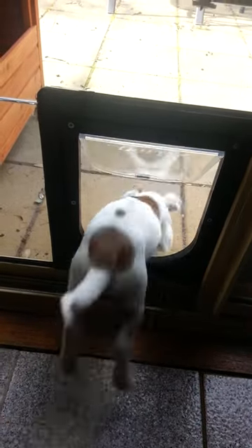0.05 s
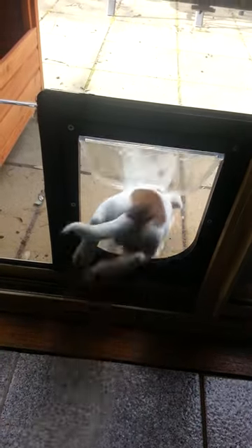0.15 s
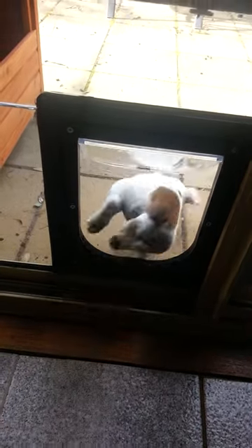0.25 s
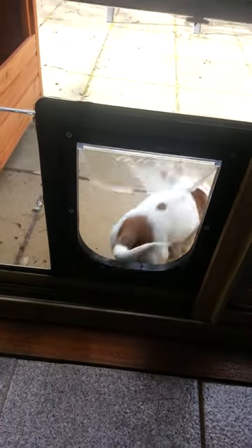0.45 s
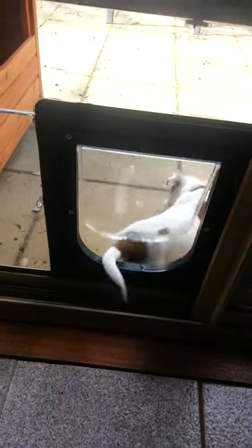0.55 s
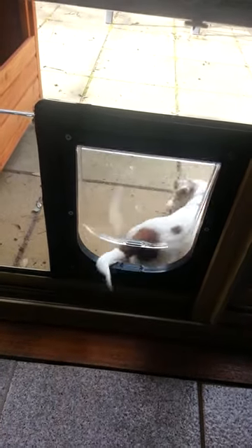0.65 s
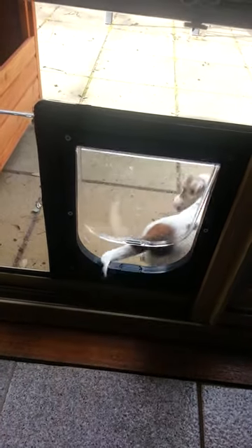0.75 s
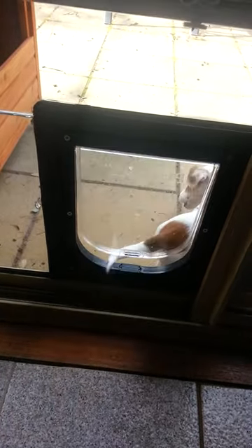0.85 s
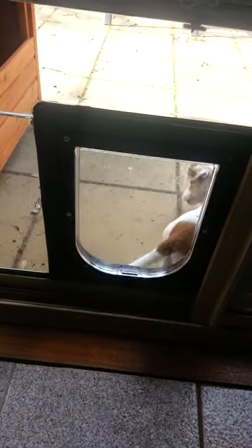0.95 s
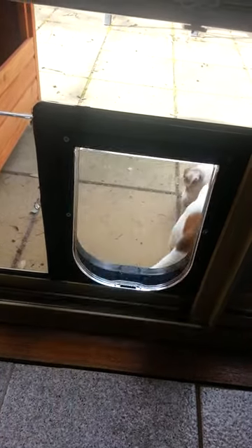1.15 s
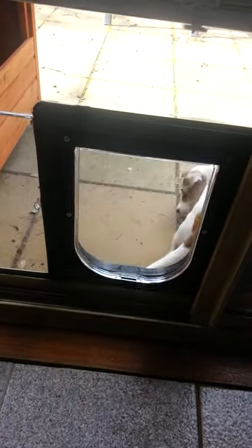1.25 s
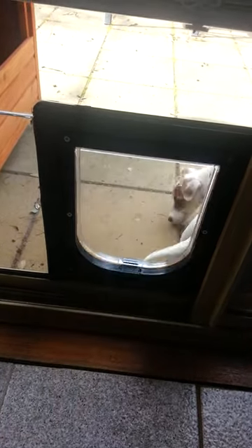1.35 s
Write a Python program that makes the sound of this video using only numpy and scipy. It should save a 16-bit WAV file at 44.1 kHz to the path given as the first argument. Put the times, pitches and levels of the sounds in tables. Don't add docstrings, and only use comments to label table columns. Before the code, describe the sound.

A plastic pet flap clatters and bangs in its door as a puppy scrambles through

```python
import sys
import numpy as np
from scipy import signal
from scipy.fft import rfft, irfft, next_fast_len
from scipy.io import wavfile
from scipy.ndimage import uniform_filter1d

SR = 44100
rng = np.random.default_rng(int(sys.argv[2]) if len(sys.argv) > 2 else 0)


def makeup_ratio(level_db):
    decades = np.asarray(level_db, float) / 20
    return 10 ** decades


def generate_wav(sig):
    pcm = np.round(np.clip(np.atleast_2d(sig).T, -1, 1) * 32767).astype(np.int16)
    wavfile.write(sys.argv[1], SR, pcm)


N = 61739
T = np.arange(N) / SR
WIDE = next_fast_len(N)
HZ = np.maximum(np.arange(WIDE // 2 + 1) * SR / WIDE, 1)


def along(table, hz, axis=1):
    table = np.array(table)
    return np.interp(np.log(hz), np.log(table[:, 0]), table[:, axis])


def unit(x):
    return x / np.sqrt(np.sum(x ** 2, axis=-1, keepdims=True))


def fade(t, t60):
    return np.exp(-np.log(1000) * t / np.maximum(t60, .002))


def band(x, hz, width):
    bell = np.exp(-(np.log2(HZ / hz) / width) ** 2)
    return irfft(rfft(x, WIDE) * bell, WIDE)[..., :N]


def slow_noise(size, passes=1):
    x = rng.standard_normal(N)
    for _ in range(passes):
        x = uniform_filter1d(x, size=size)
    return unit(x) * np.sqrt(N)


def coloured(table, alike_hz):
    mid, side = rfft(rng.standard_normal((2, WIDE)))
    apart = np.sqrt(1 / (1 + (alike_hz / HZ) ** 2))
    pair = (mid + apart * side * np.array([[1], [-1]])) / np.sqrt(1 + apart ** 2)
    return unit(irfft(pair * makeup_ratio(along(table, HZ)), WIDE)[:, :N]) * np.sqrt(N)


def tail(table, alike_hz, size, count=1):
    noise = coloured([(20, 0), (20000, 0)], alike_hz)
    centres = 50 * 2 ** (np.arange(17) / 2)
    t60 = along(table, centres, axis=2)[:, None]
    bands = np.array([band(noise, c, 0.59) for c in centres])
    level = makeup_ratio(along(table, centres))[:, None] / np.sqrt(t60)
    shape = (level * fade(T[:size], t60))[:, None]
    step = (N - size) // count
    return [unit(np.sum(bands[..., k * step:k * step + size] * shape, axis=0)) for k in range(count)]


def ring(modes, scatter_db, size):
    hz, db, t60 = np.array(modes).T[:, :, None]
    t = T[:size]
    waves = makeup_ratio(db + scatter_db[:, None]) * fade(t, t60) * np.sin(2 * np.pi * hz * t)
    return unit(np.sum(waves, axis=0))


def add(out, at_s, x):
    i = int(round(at_s * SR))
    x = x[..., max(-i, 0):N - i]
    out[:, max(i, 0):max(i, 0) + x.shape[-1]] += x


# frequency in Hz, level in dB per Hz.
ROOM_TONE = [(25, -24), (110, -10.5), (230, -6.5), (450, -12), (2000, -24), (6500, -31.5), (11500, -27),
             (15700, -28.5)]
# time in seconds, gain in dB.
TONE_GAIN = [
    (0, 5),
    (.7, 5),
    (1.0, 0.5),
    (1.2, 2.5),
    (1.3, -2),
    (1.4, -0.5),
]
TONE_DB, TONE_ALIKE_HZ = -54, 490


def room_tone():
    gain_db = np.interp(T, *np.array(TONE_GAIN).T)
    return makeup_ratio(TONE_DB + gain_db) * coloured(ROOM_TONE, TONE_ALIKE_HZ)


# frequency in Hz, level in dB, t60 in seconds.
ROOM = [(80, -5, 0.17), (200, 0, 0.68), (605, 2.5, 0.49), (1500, -3, 0.67), (2600, -0.5, 0.42),
        (3840, -3, 0.76), (5600, -7, 0.77), (13700, 3.5, 0.063)]
ROOM_DB, ROOM_DELAY_S, ROOM_ALIKE_HZ = -7.5, 0.0029, 836


def reverberation(x):
    size = 30000
    build_up = 1 - np.exp(-(T[:size] / ROOM_DELAY_S) ** 2)
    echo = tail(ROOM, ROOM_ALIKE_HZ, size)[0] * build_up
    return makeup_ratio(ROOM_DB) * signal.fftconvolve(x[:1], echo, axes=1)[:, :N]


# frequency in Hz, level in dB per Hz.
FUR = [(59, -32), (100, -18), (640, 0.5), (1180, -7.5), (1430, -4.5), (4280, -10), (6950, -23),
       (13900, -18), (15500, -37)]
# time in seconds, fur level in dB, claw squeak level in dB.
BRUSH = [
    (0, -41.5, -54),
    (.04, -44, -61),
    (.085, -42, -61),
    (0.109, -50.5, -55),
    (.15, -44, -48.5),
    (0.174, -57.5, -57),
    (0.202, -52, -80),
    (.3, -67, -78),
]
SQUEAK_HZ = 4270


def brush():
    s, fur_db, squeak_db = np.array(BRUSH).T
    patchy = slow_noise(300)
    fur = coloured(FUR, 1000) * makeup_ratio(np.interp(T, s, fur_db) + 1.2 * patchy)
    squeak = unit(band(rng.standard_normal(N), SQUEAK_HZ, 0.18)) * np.sqrt(N)
    return fur + squeak * makeup_ratio(np.interp(T, s, squeak_db) + 2 * patchy)


SCUFF_TIMES_S = [.080, .105, .228, .236, .393, .400, .630, .632, .650, .668, 1.017, 1.018, 1.020, 1.030]
# level in dB, pitch in Hz, length in
# seconds.
SCUFFS = [(-48, 1000, 0.0027), (-47, 217, 0.088), (-17.5, 820, 0.015), (-14.5, 193, 0.02),
          (-27, 2676, 0.017), (-26, 1278, 0.02), (-32.5, 2700, 0.0044), (-45, 1200, 0.058),
          (-34, 140, 0.027), (-31, 2540, 0.0068), (-38, 1520, 0.018), (-57, 690, 0.021),
          (-39, 2080, 0.0069), (-43, 342, 0.11)]


def scuffs():
    out, size = np.zeros((2, N)), 4000
    for s, (db, hz, length_s) in zip(SCUFF_TIMES_S, SCUFFS):
        t = T[:size] / length_s
        slide = band(rng.standard_normal(N), hz, 0.097)[:size] * t * np.exp(-3.0 * t)
        add(out, s, makeup_ratio(db + 28.5) * unit(slide))
    return out


# start in seconds, pitch in Hz, level in dB, t60 in seconds.
RINGS = [(0.222, 78, -20, 0.23), (0.629, 80, -36, 0.33), (0.11, 200, -35, 0.12), (.236, 207, -11.5, 0.12),
         (0.286, 137, -28.5, 0.23), (.33, 237, -38, 0.17), (.43, 156.6, -32.5, 0.183),
         (.245, 878.5, -19, 0.39), (0.233, 1325, -18, 0.05), (0.256, 338, -23.5, 0.18),
         (0.26, 230.5, -22, 0.32), (0.278, 1265, -17.5, 0.076), (.369, 787, -24.5, 0.11),
         (0.366, 932, -25, 0.16), (.398, 1261, -14, 0.13), (0.399, 1457, -19, 0.073),
         (0.417, 924, -18, 0.06), (.44, 888, -35.5, 0.51), (.455, 1266, -31.5, 0.16),
         (0.432, 345, -36.5, 0.22), (.497, 200, -33.5, 0.13), (0.633, 1069, -29, .25),
         (0.651, 171, -32.5, 0.23), (0.664, 1500, -21.5, 0.1), (.672, 732.7, -28, 0.15),
         (.673, 304, -34, 0.068), (0.674, 1250, -30, .12), (0.699, 342.4, -36, 0.5), (.718, 153, -34, 0.17),
         (0.746, 1295, -32, 0.13), (0.769, 946, -44, 0.26), (1.02, 1500, -40.5, 0.24),
         (1.025, 176.4, -37, .12), (1.028, 320, -29, 0.11), (1.06, 519, -41.5, 0.48),
         (1.336, 109, -46, 0.31)]
RING_RISE_S, RING_SPREAD_RAD = 0.0014, 0.21


def rings():
    out, t = np.zeros((2, N)), T[:12000]
    apart = RING_SPREAD_RAD * np.array([[-1], [1]])
    for s, hz, db, t60 in RINGS:
        envelope = fade(t, t60) * (1 - np.exp(-t / RING_RISE_S))
        add(out, s, makeup_ratio(db) * envelope * np.sin(2 * np.pi * hz * t + apart))
    return out


# start in seconds, snap level in dB, sizzle level in dB, sizzle pitch in Hz.
TICKS = [(0.082, -57, -40, 12000), (0.2248, -12.5, -24.5, 9600), (0.2334, -19, -19.5, 9600),
         (0.241, -22, -39, 9000), (0.254, -20, -39, 6700), (0.274, -21, -28, 12000),
         (0.263, -24, -31, 9000), (0.2763, -13, -18.5, 12200), (0.369, -35, -45, 10150),
         (0.398, -23.5, -61, 7000), (0.443, -39, -38, 11600), (0.5374, -46, -35, 11100),
         (0.628, -30.5, -34, 10300), (0.645, -38, -47, 6700), (0.662, -31.5, -39, 11300),
         (.669, -20, -30.5, 9000), (1.026, -35, -55, 6500)]
SNAP_HZ, SNAP_T60_S = 4450, 0.0039
SIZZLE_OCTAVES, SIZZLE_T60_S = .5, 0.0078


def ticks(size=1500):
    out, t = np.zeros((2, N)), T[:size]
    rise = 1 - np.exp(-t / 0.00052)
    for s, snap_db, sizzle_db, hz in TICKS:
        noise = rng.standard_normal((3, N))
        snap = band(noise[0], SNAP_HZ, 0.25)[:size] * fade(t, SNAP_T60_S) * rise
        sizzle = band(noise[1:], hz, SIZZLE_OCTAVES)[:, :size] * fade(t, SIZZLE_T60_S) * rise
        add(out, s, makeup_ratio(snap_db + 15) * unit(snap) + makeup_ratio(sizzle_db + 13.5) * unit(sizzle))
    return out


# start in seconds, level in dB, t60 in seconds.
BOOMS = [(0.08, -35, 0.23), (0.111, -29.5, 0.12), (0.228, -11, 0.26), (0.244, -16.5, 0.15),
         (0.259, -21, 0.14), (0.275, -24.5, .12), (0.376, -21.5, 0.076), (0.393, -15, 0.11),
         (0.411, -28, 0.069), (0.523, -35, 0.13), (0.634, -25, 0.28), (0.646, -27, 0.13),
         (0.673, -28, 0.17), (0.683, -20, 0.17), (0.707, -40, 0.096), (1.02, -31.5, 0.19)]
BOOM_HZ, BOOM_RISE_S = 616.3, 0.00051
BOOM_WOBBLE_RAD, BOOM_FLUTTER_DB = 0.53, 2.5


def boom():
    s, db, t60 = np.array(BOOMS).T[:, :, None]
    since = np.maximum(T - s, 0)
    blows = makeup_ratio(db) * fade(since, t60) * (1 - np.exp(-since / BOOM_RISE_S))
    level = np.sqrt(np.sum(blows ** 2, axis=0))
    wobble = slow_noise(400, passes=2)
    flutter = makeup_ratio(BOOM_FLUTTER_DB * wobble[::-1])
    return level * flutter * np.sin(2 * np.pi * BOOM_HZ * T + BOOM_WOBBLE_RAD * wobble)


# frequency in Hz, level in dB, t60 in seconds.
PANEL = [(238, -33, 0.079), (332, -22, 0.3), (584.7, -6.5, 0.08), (687, -14.5, 0.074), (713.3, -10, 0.13),
         (725, -24.5, 0.2), (880, -12.5, 0.063), (993, -28, 0.11), (1072, -22, 0.15), (1264.7, -10, 0.13),
         (1325, -7, 0.045), (1477, -4.5, 0.055), (1573, -19.5, 0.16), (792, -17.5, 0.15)]
# frequency in Hz, level in dB, t60 in seconds.
THUD = [(80, -0.5, 0.11), (142.3, -7, 0.19), (177.8, 4.5, .08), (202.2, 12, 0.057), (234, 0.5, 0.28),
        (266, -3.5, 0.32), (297, -5, 0.35), (327.6, -8.5, 0.54), (420, -21, 0.097)]
# frequency in Hz, level in dB, t60 in seconds.
CROWD = [(152, -5.5, 0.13), (400, -8, 0.17), (710, 2.5, 0.17), (1440, -2, 0.092), (2800, -0.5, 0.088),
         (4080, -16.5, 0.048), (5400, -20, 0.013), (12000, -32, 0.047)]
# start in seconds, rattle level in dB, contact time in ms, then panel ring
# and thud levels in dB relative to the rattle.
KNOCKS = [(-.004, -47, 0.17, -3, 9.5), (.079, -34.5, 0.15, 1.5, -0.5), (.088, -42.5, 0.8, -9, 11),
          (.110, -43.5, 0.79, 5, 10.5), (0.146, -59, 1, 2, 8), (0.2235, -19.5, 0.26, -3, -12),
          (.229, -19.5, 0.12, 4, -15), (0.2342, -29, .08, 6, -20), (.241, -15.5, 0.14, -5.5, -3.5),
          (.263, -23, 0.035, -12, -12), (.255, -18, 0.12, -7, -3.5), (.274, -24, 0.052, -4, -23),
          (0.3692, -26.5, 0.17, -2.5, -7), (.376, -33.5, 0.97, -5, -6), (.383, -30.5, 0.22, 1, -2.5),
          (.392, -21.5, 0.19, -4, -16), (.405, -25.5, 0.32, -6.5, -10.5), (.535, -43, 0.71, -15, -20),
          (0.617, -46, 0.075, -20, -17), (.629, -28.5, 0.051, -7.5, -4.5), (.636, -33.5, 0.21, -8, -5.5),
          (.643, -27.5, 0.21, -1.5, -16), (.652, -30.5, 0.15, -9, -4.5), (.661, -29.5, 0.1, -6, -13),
          (.669, -23, 0.11, -6, -24), (.680, -32, 0.51, 0.5, -23), (.708, -34, 0.29, -5, -20),
          (1.015, -37, 1, -4, -0.5), (1.019, -32.5, 0.82, -10, -21), (1.025, -39, 0.45, 0, 0),
          (1.033, -36.5, 1, 1.5, 0), (1.066, -43.5, 0.82, -25, 2)]
CONTACTS_PER_S, CHATTER_S, RATTLE_ALIKE_HZ = 600, 0.0049, 2470
BLOW_RISE_S, MODE_SCATTER_DB = 0.002, 3


def chatter(contact_ms, size):
    gaps, sizes = rng.exponential(size=30), rng.standard_normal(30)
    when = (np.cumsum(gaps) - gaps[0]) / CONTACTS_PER_S
    force = np.zeros(size)
    hits = np.sign(sizes) * makeup_ratio(4.15 * sizes) * np.exp(-when / CHATTER_S)
    np.add.at(force, (when * SR).astype(int), hits)
    soft = np.exp(-2 * np.pi * 1000 / max(contact_ms, .02) / 2 / SR)
    return signal.lfilter([1 - soft], [1, -soft], force)[None, :size // 4]


def knocks(size=11000):
    out = np.zeros((2, N))
    crowds = tail(CROWD, RATTLE_ALIKE_HZ, size, count=len(KNOCKS))
    rise = 1 - np.exp(-T[:size] / BLOW_RISE_S)
    for crowd, (s, db, contact_ms, ring_db, thud_db) in zip(crowds, KNOCKS):
        force = chatter(contact_ms, size)
        rattle = unit(signal.fftconvolve(force, crowd, axes=1))[:, :size]
        panel = ring(PANEL, MODE_SCATTER_DB * rng.standard_normal(len(PANEL)), size)
        thud = ring(THUD, MODE_SCATTER_DB * rng.standard_normal(len(THUD)), size)
        blow = makeup_ratio(ring_db) * panel + makeup_ratio(thud_db) * thud
        add(out, s, makeup_ratio(db + 29.5) * (rattle + blow * rise))
    return out


# frequency in Hz, level difference in dB.
PORTS = [(300, -0.5), (1500, 0.5), (3000, 2), (4500, 17.5), (6500, -9), (10000, 14), (13000, 15)]
LEFT_LAG_S = .00009


def ports(x):
    lift = makeup_ratio(along(PORTS, HZ) / 2)
    late = np.exp(-2j * np.pi * HZ * LEFT_LAG_S)
    return irfft(rfft(x, WIDE) * np.array([lift * late, 1 / lift]), WIDE)[:, :N]


RINGS_WET_DB = -8
MIC_ORDER, MIC_LOW_HZ, MIC_TOP_HZ = 3, 131, 14600
CEILING = 1.8


def scene():
    clatter = knocks() + ticks()
    tones = scuffs() + boom() + rings()
    direct = ports(clatter + tones)
    wet = reverberation(clatter + makeup_ratio(RINGS_WET_DB) * tones)
    low_cut = signal.butter(MIC_ORDER, MIC_LOW_HZ, "high", fs=SR, output="sos")
    return signal.sosfilt(low_cut, direct + wet) + brush() + room_tone()


# time in seconds, share kept from 0 to 1.
TREBLE_KEPT = [
    (.285, 1),
    (.335, .05),
    (.40, .02),
    (.439, .05),
    (.441, 1),
    (.685, 1),
    (.70, .5),
    (.76, 1),
]
TREBLE_HZ = 12000


def thin_treble(x):
    treble = irfft(rfft(x, WIDE) * (HZ > TREBLE_HZ), WIDE)[:, :N]
    return x - treble * (1 - np.interp(T, *np.array(TREBLE_KEPT).T))


def band_limit(x):
    return signal.sosfilt(signal.butter(12, 15850, fs=SR, output="sos"), x)


def record(dry):
    rounded = CEILING * np.tanh(dry / CEILING)
    top_cut = signal.ellip(8, .5, 30, MIC_TOP_HZ, fs=SR, output="sos")
    mix = thin_treble(signal.sosfilt(top_cut, rounded))
    return band_limit(mix)


dry = scene()
out = record(dry)
generate_wav(out)
```